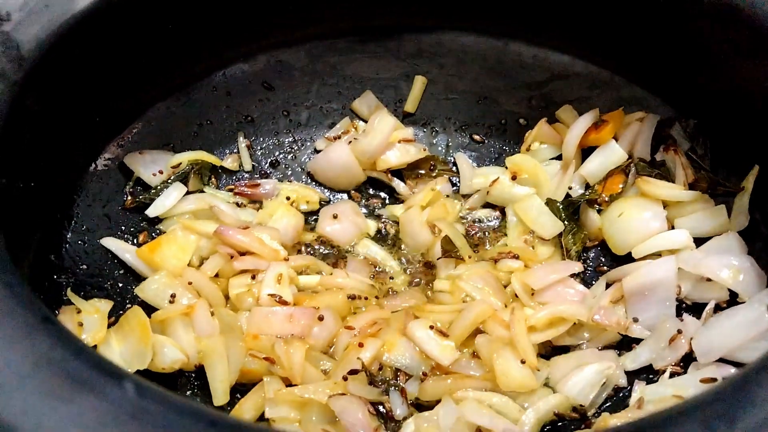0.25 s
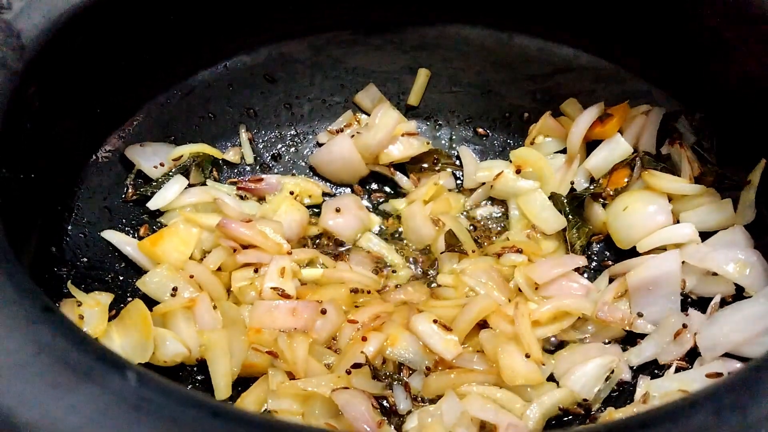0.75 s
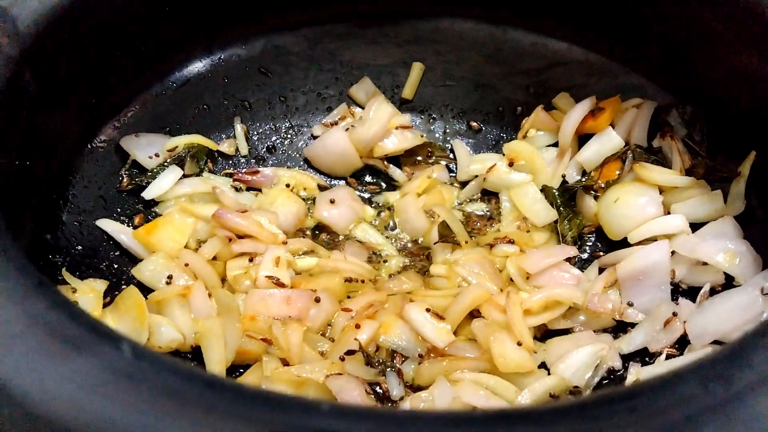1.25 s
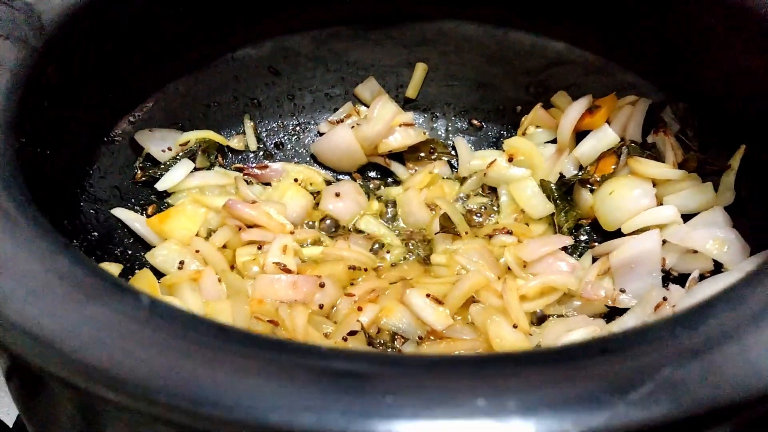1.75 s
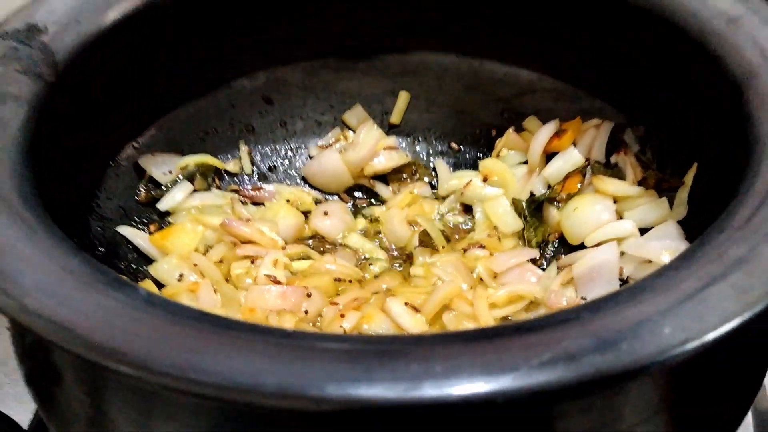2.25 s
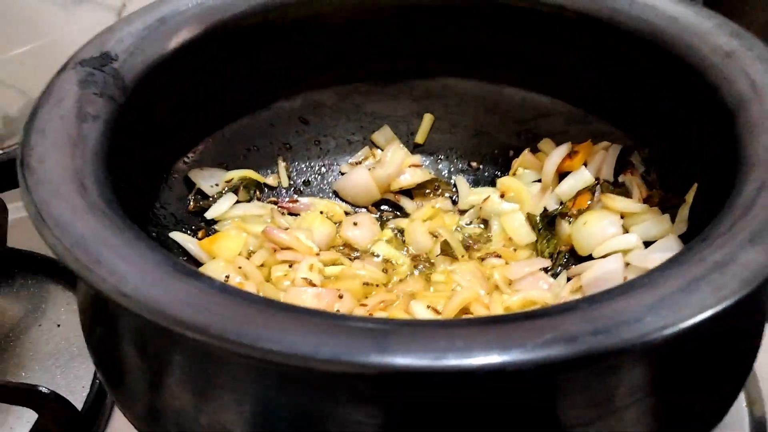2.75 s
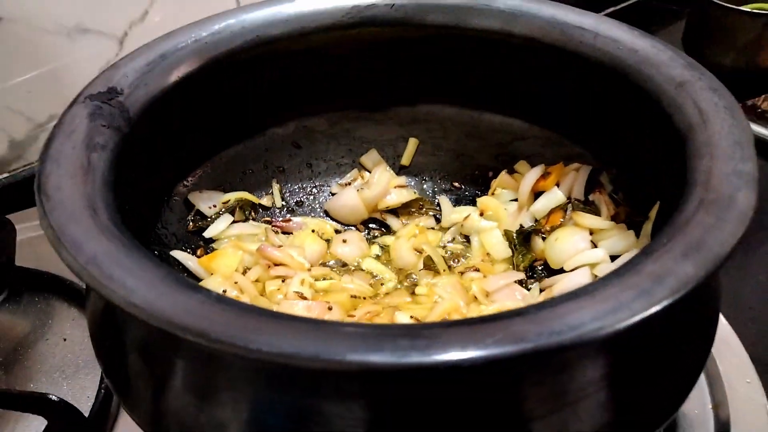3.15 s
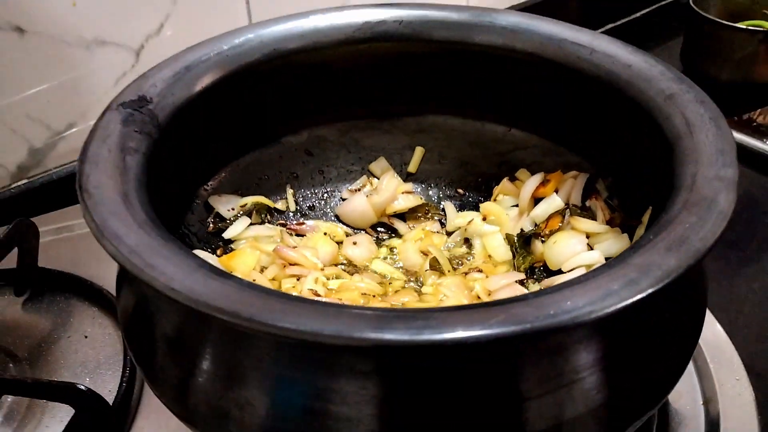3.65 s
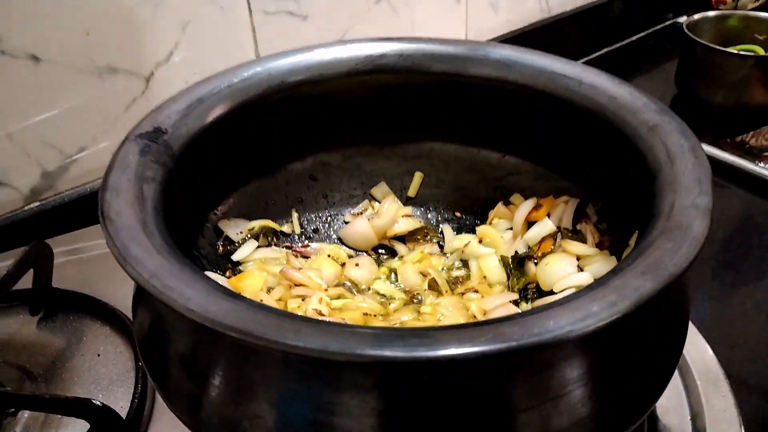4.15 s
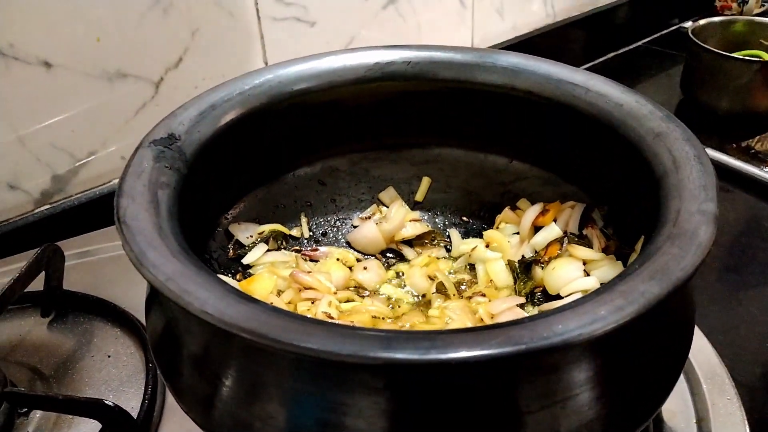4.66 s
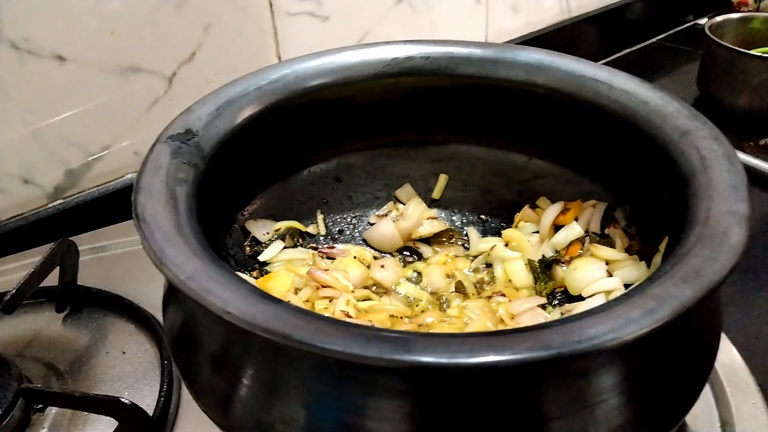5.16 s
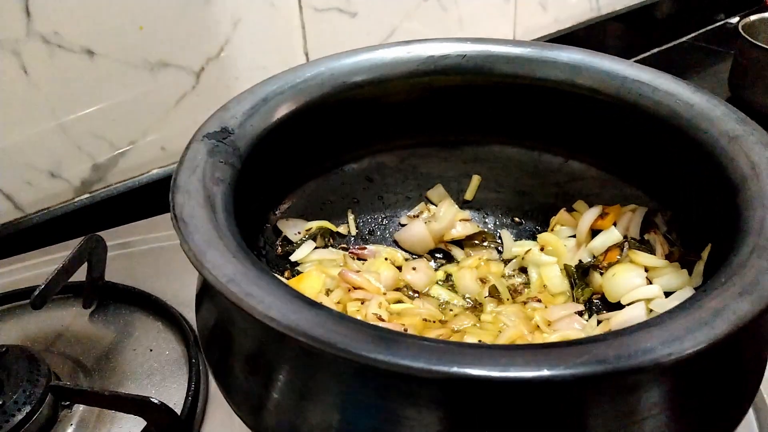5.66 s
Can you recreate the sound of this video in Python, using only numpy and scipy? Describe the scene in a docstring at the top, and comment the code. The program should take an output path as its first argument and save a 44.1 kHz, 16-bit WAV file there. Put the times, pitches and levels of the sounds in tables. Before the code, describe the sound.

A wooden spatula knocks and scrapes a clay pot of sizzling onions over a low throbbing hum, then a steel utensil rattles brightly.

```python
"""A wooden spatula knocks and scrapes on a clay pot: short noisy contacts ring the modes of pot, spatula or
other things and the tiled room answers; patchy band noise rubs, noise bands narrow or wide sing, and noise in
broad resonances makes tails and rough scrapes. Frying onions hiss and spit. A low engine-like hum, noisy
lines over a rumble, throbs underneath. At last a steel utensil rattles, taps and swelling modes, and the hum
drops away, its rumble returning at the very end. The recorder's noise suppressor turns down quiet moments."""
import sys
import numpy as np
from scipy import signal
from scipy.fft import rfft, irfft, next_fast_len
from scipy.io import wavfile
from scipy.ndimage import uniform_filter1d, map_coordinates

SR = 44100
rng = np.random.default_rng(int(sys.argv[2]) if len(sys.argv) > 2 else 0)


def master(y):
    """Save y as 16-bit WAV."""
    cut = np.clip(np.atleast_2d(y).T, -1, 1)
    pcm = np.round(cut * 32767)  # scale
    wavfile.write(sys.argv[1], SR, pcm.astype(np.int16))


N = 260278

# modes of the steel utensil: (frequency [Hz], relative level [dB])
STEEL = [(1857, -54), (2003, -52), (2121, -56), (2315, -39), (2815, -41), (2993, -36), (3160, -45),
         (4215, -37), (4414, -43), (4823, -55), (5222, -42), (5351, -48), (5588, -40), (5766, -46),
         (6045, -31), (6169, -44), (6665, -35), (6767, -49), (6934, -29), (7079, -33), (7370, -43),
         (7704, -37), (8430, -36), (8699, -32), (8882, -45), (9232, -50), (9340, -44), (9593, -45),
         (9717, -35), (9911, -53), (10212, -33), (10395, -42), (10794, -47), (10944, -41), (11197, -38),
         (11305, -49), (11768, -42), (12387, -36), (12462, -45), (12581, -33), (12941, -43), (13135, -48),
         (13216, -41), (13426, -48), (13609, -46), (13770, -49), (14131, -52), (14519, -46), (14594, -47),
         (14691, -46), (14879, -47), (15176, -48)]
# resonances of things other than the pot wall: (frequency [Hz], width [Hz], relative level [dB])
HOLLOW = [(474, 17, -2.5), (797, 92, 0), (1480, 45, -8.5), (1860, 33, -27.5), (2215, 97, -16),
          (2780, 38, -25), (2940, 16, -7), (3540, 170, -4), (3820, 25, -1.5)]
# same columns
DULL = [(495, 60, -2), (960, 140, -2), (1235, 80, 0), (1660, 60, -22), (2040, 37, -12), (2890, 60, -13),
        (3350, 90, -18.5)]
# same columns
WOODEN = [(880, 160, -9.5), (1020, 56, -0.5), (1094, 32, 2.5), (1225, 92, -7.5), (1560, 47, -18.5),
          (2345, 50, -6.5), (2850, 170, -18.5), (3400, 200, -16.5)]
# same columns
HIGH = [(1032, 67, -7), (1136, 41, -1), (1227, 34, 0), (2500, 200, -19)]
# same columns
CRISP = [(2550, 310, -0.35), (3480, 180, -1.4), (4900, 430, -1.5)]
# same columns
TINNY = [(508, 17, -10), (840, 60, -8), (1553, 15, -14.5), (2410, 64, -5), (3410, 300, -14),
         (4480, 42, -5.5), (4810, 39, -4.5), (5190, 28, -20), (5760, 35, -23)]
# same columns
HARD = [(2400, 450, -4.5), (2800, 450, 0), (3350, 500, -1.5), (4500, 700, -11)]


def amp(db):
    """dB to gain."""
    return 10 ** (np.asarray(db) / 20)


def unit(x):
    """Scaled to rms 1."""
    return x / np.sqrt(np.mean(x ** 2) + 1e-20)


def along(points, hz):
    """(Hz, value) points interpolated on a log frequency axis."""
    f, v = np.transpose(points)
    return np.interp(np.log(hz + 1), np.log(f + 1), v)


def curves(rows):
    """One value per sample for each dB column; -120 dB outside the rows."""
    s, *cols = np.transpose(rows)
    return [np.interp(np.arange(N) / SR, s, c, left=-120, right=-120) for c in cols]


def wobble(rate, size=N):
    """Smooth random curve, rate knots a second."""
    knots = rng.standard_normal(int(size * rate / SR) + 4)
    return map_coordinates(knots, [np.arange(size) * rate / SR])


def filtered(x, response):
    """x times a complex response of frequency."""
    m = next_fast_len(len(x) + SR // 2)
    return irfft(rfft(x, m) * response(np.fft.rfftfreq(m, 1 / SR)), m)[:len(x)]


def modes(table, f):
    """Response of causal (Hz, width Hz, dB) resonances, summed with alternating sign."""
    return sum((-1) ** k * amp(db) * 1j * f * w / (c * c - f * f + 1j * f * w)
               for k, (c, w, db) in enumerate(table))


def band(x, lo_hz, hi_hz):
    """Causal band-pass."""
    return signal.sosfilt(signal.butter(2, [lo_hz, hi_hz], "band", fs=SR, output="sos"), x)


def patchy(patchy_db, bins, frames):
    """Noise whose level differs in patches of pitch and time."""
    z = signal.stft(rng.standard_normal(N), nperseg=1024)[2]
    field = uniform_filter1d(rng.standard_normal(z.shape), size=bins, axis=0)
    field = unit(uniform_filter1d(field, size=frames, axis=1))
    gain = amp(patchy_db * np.minimum(field, 1.6))  # caps the loudest patches
    return signal.istft(z * gain, nperseg=1024)[1][:N]


def grains(share, spread_db):
    """Randomly placed clicks of widely scattered size; share is the fraction of samples that click."""
    draw = rng.random((2, N))
    size = amp(-spread_db * np.log(1 - .98 * draw[1]))
    return (draw[0] < share) * size * rng.standard_normal(N)


def fuzzy(hz, width_hz, steady=0, size=N):
    """Line of rms 1 whose strength and phase wander about a steady part; hz may glide."""
    turn = 2 * np.pi * np.cumsum(np.broadcast_to(hz, size)) / SR
    in_phase = (steady + wobble(width_hz, size)) * np.cos(turn)
    return unit(in_phase + wobble(width_hz, size) * np.sin(turn))


def hum():
    """Unsteady lines at or near multiples of a firing rate, over a low rumble."""
    # level course: (time [s], rumble [dB before a 3.5 dB cut], third order [dB], fifth order [dB])
    hum_course = [(0.0, -39, -41.5, -48.5), (0.3, -37, -45, -48), (0.6, -35.5, -40, -59),
                  (0.76, -38, -34, -60), (0.92, -39.5, -33, -68), (1.03, -33.5, -38, -39),
                  (1.08, -38, -45, -48), (1.43, -34, -44, -38.5), (1.49, -32, -35.5, -52.5),
                  (1.56, -37.5, -38.5, -47.5), (2.1, -37, -50.5, -33.5), (2.27, -37.5, -73, -41),
                  (2.35, -35.5, -46.5, -44.5), (2.81, -34, -55.5, -35), (3.52, -34.5, -37.5, -35),
                  (5.09, -36.5, -51, -53), (5.26, -37, -36.5, -45), (5.34, -42, -64, -84),
                  (5.83, -52.5, -49.5, -82), (5.9, -40.5, -46.5, -66)]
    # rumble spectrum: (frequency [Hz], relative level [dB])
    rumble_colour = [(12, -100), (20, -54.5), (32, -18), (97, 9), (173, 5.5), (252, -4.5), (331, -20),
                     (400, -78), (520, -84), (880, -120)]
    # weaker lines: (order [multiple of the firing rate], level over the rumble [dB])
    weak_orders = [(2, -13), (4, -3.5), (6, -12), (7, -16.5)]
    firing_hz = 34.54
    waver_db, waver_knots_per_s = 0.5, 5.8
    rumble_db, third_db, fifth_db = [db + waver_db * wobble(waver_knots_per_s) for db in curves(hum_course)]
    rumble = unit(filtered(rng.standard_normal(N), lambda f: amp(along(rumble_colour, f))))
    weak = sum(amp(db) * fuzzy(k * firing_hz, 12) for k, db in weak_orders)
    third = fuzzy(106, 12, steady=1.5)
    fifth = fuzzy(174, 12, steady=1.5)
    return amp(rumble_db - 3.5) * (rumble + weak) + amp(third_db) * third + amp(fifth_db) * fifth


def sizzle():
    """Frying oil: patchy hiss with tiny spits, over the quiet kitchen air."""
    # level course: (time [s], below about 9 kHz [dB], above [dB])
    sizzle_course = [(0.0, -49, -51), (0.69, -52.5, -52.5), (1.33, -49.5, -55.5), (1.57, -53.5, -52),
                     (1.8, -52, -53), (2.01, -48, -50.5), (2.27, -51.5, -54.5), (2.41, -49.5, -56),
                     (3.01, -53, -50), (3.21, -52.5, -50.5), (3.87, -52.5, -56), (4.14, -53.5, -56),
                     (4.36, -55, -56), (5.27, -58, -57)]
    # hiss spectrum: (frequency [Hz], relative level [dB])
    fizz_colour = [(2060, -55.5), (3500, 2), (4040, -33), (4350, -53.5), (5150, 0.5), (5900, 5.5),
                   (7000, 1), (8400, 2), (10000, 2.5), (11600, 1), (13000, -1.5), (14800, -3), (15500, -31)]
    # air spectrum: (frequency [Hz], relative level [dB])
    air_colour = [(12, -54), (20, -6.5), (83, 6), (519, -3.5), (667, -4.5), (2760, -10), (3080, -11),
                  (3960, -52.5), (4310, -31), (4810, -5.5), (6910, -8.5), (11400, -10.5), (15500, -12)]
    spit_share, spit_db = 0.006, -4  # fraction of samples; level over the hiss
    spits = unit(grains(spit_share, spread_db=5))
    oil = unit(patchy(1.1, 12, 10)) + amp(spit_db) * spits
    air = unit(filtered(patchy(4.2, 12, 10), lambda f: amp(along(air_colour, f))))
    hiss = filtered(oil, lambda f: amp(along(fizz_colour, f)))
    low = filtered(hiss, lambda f: 1 / (1 + (f / 9000) ** 8))
    low_db, high_db = curves(sizzle_course)
    return amp(low_db) * unit(low) + amp(high_db) * unit(hiss - low) + amp(-51) * air


def strokes():
    """Rubbing wakes now one, now another resonance of pot and spatula: patchy noise in four bands."""
    # level course: (time [s], lowest band [dB], second [dB], third [dB], highest [dB])
    stroke_course = [(0.0, -62, -56, -44.5, -60), (0.17, -64, -50.5, -55, -58),
                     (0.32, -68, -54.5, -55.5, -56), (0.5, -64, -58.5, -52.5, -60.5),
                     (0.65, -67, -56, -51.5, -63), (0.75, -43, -48, -53.5, -63.5),
                     (0.86, -40.5, -45, -46.5, -54), (1.04, -49.5, -50.5, -48.5, -56),
                     (1.16, -49.5, -31, -47.5, -45), (1.25, -41.5, -40, -36, -43),
                     (1.38, -42, -38.5, -51, -47.5), (1.54, -56.5, -45, -41.5, -44.5),
                     (1.79, -52.5, -53, -47, -48.5), (1.92, -46.5, -51.5, -46.5, -47),
                     (2.08, -67, -46.5, -48, -45), (2.25, -60.5, -46, -36.5, -44),
                     (2.35, -57.5, -50, -44, -48.5), (2.48, -61, -44, -45.5, -53.5),
                     (2.64, -57.5, -64, -43, -52), (2.74, -58.5, -45, -44, -41),
                     (2.92, -53, -50.5, -45, -52), (3.16, -52, -58, -45.5, -51),
                     (3.29, -58.5, -55, -46.5, -55), (3.61, -66.5, -67.5, -49, -54),
                     (3.74, -67, -52, -46, -48.5), (3.9, -52, -62.5, -46.5, -60.5),
                     (4.14, -54, -44, -45, -62), (4.3, -52, -47, -47, -65), (4.4, -54, -58, -49, -65),
                     (4.61, -66, -62, -48.5, -57.5), (4.76, -70, -56.5, -48, -55.5),
                     (4.92, -71, -60, -54, -67.5), (5.03, -58, -51.5, -47.5, -50),
                     (5.14, -58, -57.5, -47.5, -55), (5.27, -73, -64, -56.5, -63)]
    edges_hz = [(240, 450), (450, 850), (850, 1750), (2100, 5000)]
    depth_db = [6, 9.0, 5.9, 7.4]
    # each band-pass runs twice for steeper edges
    rubs = [unit(band(band(patchy(d, 3, 12), *e), *e)) for d, e in zip(depth_db, edges_hz)]
    return sum(amp(db) * rub for db, rub in zip(curves(stroke_course), rubs))


def singing():
    """Noise bands, narrow or wide, start quickly and fade, some gliding: rubbing tones, rings, late steel."""
    # rubbing tones, rings after blows and late steel ringing:
    # (start [s], length [s], from [Hz], to [Hz], width [Hz], level before fade [dB])
    singing_bands = [(0, 0.066, 764, 776, 72, -46.5), (0.119, 0.11, 3820, 3730, 103, -35.5),
                     (0.27, 0.6, 773, 771, 67, -50), (0, 0.97, 1510, 1543, 145, -54),
                     (1.016, 0.21, 235.6, 235.6, 13.7, -30), (1.008, 0.06, 400, 409, 50, -26),
                     (1.049, 0.043, 462, 460, 21, -21), (1.353, 0.22, 2285, 2380, 132, -43.5),
                     (1.42, 0.3, 3400, 3400, 50, -44), (1.73, 0.12, 3390, 3400, 70, -46),
                     (1.83, 0.17, 3460, 3440, 120, -45), (2.02, 0.05, 3150, 3150, 300, -46),
                     (2.05, 0.15, 3390, 3400, 80, -51), (1.72, 0.05, 2700, 2600, 150, -41),
                     (1.38, 0.2, 2900, 2950, 90, -48), (1.44, 0.15, 5820, 5700, 1400, -47),
                     (1.74, 0.1, 2250, 2280, 120, -47), (1.81, 0.2, 2330, 2330, 200, -44),
                     (2.0, 0.19, 2450, 2480, 200, -48), (1.819, 0.15, 5960, 5840, 2900, -44),
                     (2.012, 0.13, 1023, 1017, 228, -39), (2.57, 0.25, 5900, 5700, 600, -49),
                     (3.058, 0.34, 2620, 2610, 186, -50.5), (3.125, 0.11, 3150, 4300, 500, -42),
                     (3.2, 0.14, 4100, 5560, 600, -43), (3.18, 0.12, 802, 1190, 214, -41.5),
                     (3.294, 0.19, 1173, 1143, 100, -48.5), (3.464, 0.34, 2820, 2575, 180, -51),
                     (3.549, 0.69, 996, 1028, 275, -43), (4.059, 0.21, 517, 517.4, 3.9, -38.5),
                     (4.06, 0.21, 1560, 1552, 33, -42), (4.213, 1, 1596, 1580, 290, -53),
                     (4.42, 0.1, 1000, 990, 80, -52), (4.455, 0.09, 780, 780, 70, -50),
                     (4.48, 0.05, 1380, 1380, 60, -52), (4.3, 0.3, 2100, 2050, 250, -58),
                     (4.56, 0.13, 900, 900, 130, -49), (4.69, 0.12, 980, 1030, 100, -50),
                     (4.82, 0.05, 720, 720, 80, -49), (4.598, 0.2, 3860, 4000, 130, -56.5),
                     (4.92, 0.3, 1485, 1495, 25, -44), (4.88, 0.26, 850, 850, 60, -43),
                     (4.872, 0.085, 650, 650, 30, -44.5), (5.4, 0.1, 1478, 1478, 25, -56),
                     (5.46, 0.33, 1478, 1478, 25, -48), (5.292, 0.35, 2315, 2315, 20, -39),
                     (0.696, 0.06, 362, 360, 25, -28), (0.67, 0.15, 240, 246, 40, -37.5),
                     (0.896, 0.09, 1000, 990, 80, -43), (1.056, 0.053, 420, 412, 60, -24),
                     (4.599, 0.22, 2300, 2320, 600, -51.5)]
    out, t = np.zeros(N + SR), np.arange(SR) / SR
    for start, length, from_hz, to_hz, width_hz, db in singing_bands:
        u = np.clip(t / length, 0, 1)
        shape = np.minimum(u / 0.012, 1) * np.minimum((1 - u) / 0.67, 1)
        path_hz = from_hz + (to_hz - from_hz) * u
        line = fuzzy(path_hz, width_hz, steady=30 / width_hz, size=SR)  # the narrowest hold almost steady
        out[round(start * SR):][:SR] += amp(db) * shape * line / np.std(line[shape > 0])
    return out[:N]


def tail(n):
    """Fresh room answer of energy 1: near surfaces, and the room with each frequency dying at its own speed."""
    # room decay: (frequency [Hz], t60 [s])
    room_decay = [(200, 0.65), (800, 0.63), (2500, 0.73), (6000, 0.38), (15000, 0.67)]
    early_db, early_t60_s = -2, 0.17  # near surfaces: energy over the room's, decay
    hz, t, z = signal.stft(rng.standard_normal(n), SR, nperseg=256)
    decay = amp(-60 * t / along(room_decay, hz)[:, None])
    room = signal.istft(z * decay, SR, nperseg=256)[1][:n]
    early = rng.standard_normal(n) * amp(-60 * np.arange(n) / SR / early_t60_s)
    answer = unit(room) + amp(early_db) * unit(early)
    return answer / np.linalg.norm(answer)


def blows():
    """A short noisy contact and its room answer ring the pot and spatula, or another thing that is struck."""
    # (time [s], crack peak [dB], then thud, knock, edge and tick peaks over the crack [dB],
    #  pitch of the spatula's knock [Hz], ringing [dB], room [dB])
    blow_list = [(0.1185, -26, 5, 11.5, 1, 6.5, 770, 16.5, 5.5),
                 (0.375, -55, -20, -10, 5, 16, 751, -20, -5), (0.394, -55, -20, -5, 7, 18, 751, -20, -5),
                 (0.519, -44, -23, -4.5, 2, 14, 751, -10, 3),
                 (0.6142, -30, -26.5, 0, -30, -34, 1090, -10, 7),
                 (0.6395, -31, -9.5, -6, 7, 3, 694, -10, -2), (0.651, -35, -9.5, -6, 3, -3.5, 694, -10, -2),
                 (0.6735, -14.5, -1, -2, -11.5, -5.5, 815, 12, -2),
                 (0.688, -27, 2, 6, -8, -10, 1000, 14, 0), (0.705, -29, 5, 2, -1, -3, 1000, 8, 0),
                 (0.9889, -27.5, 12, 8.5, -5, -4.5, 838, -5.5, 4),
                 (1.011, -14, 0.5, 4, -27, -8.5, 444, 2.5, 10.5),
                 (1.0237, -20, 4, 5.5, 2.5, -1, 401, -18, 12.5),
                 (1.0337, -36.5, -4, 6.5, -1, -5, 500, -20.5, 1),
                 (1.229, -26, 2.5, -11, -0.5, 5, 398, -12.5, -2),
                 (1.3521, -28, -14.5, -1.5, -7.5, -2.5, 1090, -9, 5),
                 (1.726, -35.5, -23, 3, -12, -28.5, 724, 5.5, 5.5),
                 (2.0348, -29.5, -9.5, -5.5, -46, -14, 1310, 15.5, 6),
                 (2.1941, -17.5, -30, 8, 3, 2, 1080, 24, -1),
                 (2.212, -28, -27, 14.5, 6, -5, 1080, 30.5, -8),
                 (2.231, -28.5, -26, 10, -3, -7, 1080, 26, -11),
                 (2.2925, -43.5, -2, -10, 18, 21, 1080, -10, 3),
                 (2.385, -33, -30, -10, -2.5, -2.5, 1090, 13, 5),
                 (2.4262, -33.5, -9.5, -1.5, -3.5, 9, 940, -7, -11),
                 (2.5865, -40, -10, 17, 0, 2.5, 1020, 14, -2),
                 (2.6958, -35.5, -23, 15, -0.5, 6.5, 1150, 25, -3),
                 (2.708, -36.5, -17, 20, 2, -0.5, 1150, 26, -8),
                 (2.7212, -33, -20, -3, 12, 3, 1120, -2, -1),
                 (2.7694, -23.5, -24, -9, 3.5, 4, 1150, 10, -1),
                 (2.8163, -29.5, -14, -3.5, 5.5, -14, 1210, -19, 0),
                 (2.941, -37, -1.5, -6.5, -19, -9, 869, -5.5, 6.5),
                 (3.003, -29, -5, -13.5, -16.5, 8.5, 511, -3.5, -1),
                 (3.0493, -13.5, -32, -32, -6, 0.5, 2600, 24, -3),
                 (3.1635, -36, -34.5, 4, -1, -9, 1470, -7.5, 11),
                 (3.217, -30, -17.5, -6.5, 1.5, -2, 1040, -3, 2),
                 (3.338, -36.5, -2, 5, -25, -2, 1160, 8, 0.5),
                 (3.3982, -41.5, 2, -4, -6.5, 12, 1110, -16.5, 3.5),
                 (3.4892, -35, -10, -5.5, 4, 8, 620, -3.5, 1),
                 (3.5703, -52, -23, 23.5, 5, 0, 960, -52.5, 4.5),
                 (3.6226, -34, -19.5, 5.5, -2.5, 3, 1370, 12, 5.5),
                 (3.7216, -47, 4, 18.5, -34, -18, 1150, 2, 9.5),
                 (4.07, -20.5, 0.5, 3, 6.5, 11, 483, 19.5, -3.5),
                 (4.565, -46, -19, 8, -18, -2, 912, -13, 5),
                 (4.8713, -17.5, -32.5, -31, -8.5, -1.5, 2520, -18, -19),
                 (4.8715, -5.5, -49, -13.5, -41, -2.5, 2520, 16, -4),
                 (5.2827, -24, -33, -26, -9, 0, 1235, -14, -6.5)]
    # clay wall modes: (frequency [Hz], width [Hz], relative level [dB])
    pot_modes = [(237, 26, -6), (409, 79, 0), (942, 21, -9), (1060, 28, -7), (1220, 32, -5),
                 (1880, 82, -13), (2130, 94, -10), (2950, 33, -13), (3220, 33, -13), (4080, 29, -19),
                 (5390, 53, -21)]
    # upper spatula modes: (frequency [Hz], width [Hz], level over its knock [dB])
    tool_modes = [(2400, 250, -10), (3350, 300, -10)]
    # bands thud, knock, crack, edge, tick: (from [Hz], to [Hz])
    bands_hz = [(200, 650), (650, 1700), (1700, 3600), (3600, 6500), (6500, 16000)]
    # blows that land on another thing: (time [s], its resonances)
    struck = [(0.118, HOLLOW), (0.674, DULL), (0.688, DULL), (0.709, DULL), (2.195, WOODEN),
              (2.211, WOODEN), (2.231, WOODEN), (2.696, HIGH), (2.708, HIGH), (3.05, CRISP), (4.07, TINNY),
              (4.872, HARD)]
    contact_t60_s, dull_hz = 0.023, 9000  # wood dulls the contact above dull_hz
    wall_db, tool_db, tool_width_hz = 6.5, 16.5, 52
    uneven_db, uneven_hz = 3, 350  # peaks and dips in each room answer: depth, spacing
    n = int(.7 * SR)
    out, t = np.zeros(N + n), np.arange(n) / SR
    for s, db, thud, knock, edge, tick, knock_hz, ring_db, room_db in blow_list:
        push = rng.standard_normal(n) * amp(-60 * t / contact_t60_s)
        push[:2] = 2, -1  # the first touch is one sharp step
        answer = np.pad(tail(n), (150, 0))[:n] * np.linalg.norm(push)  # walls answer 150 samples later
        knots = rng.standard_normal(64)
        answer = filtered(answer, lambda f: amp(uneven_db * np.interp(f / uneven_hz, np.arange(64), knots)))
        tool = [(knock_hz, tool_width_hz, 0), *tool_modes]
        # where it is struck sets how strongly each wall mode speaks
        wall = [(c, w, g + rng.normal(0, 0.53)) for c, w, g in pot_modes]
        other = [thing for at, thing in struck if abs(at - s) < .005]

        def body(f):
            """Dulled contact plus ringing; another thing rings alone."""
            if other:
                ringing = modes(other[0], f)
            else:
                ringing = amp(tool_db) * modes(tool, f) + amp(wall_db) * modes(wall, f)
            return 1 / (1 + 1j * f / dull_hz) ** 2 + amp(ring_db) * ringing

        heard = filtered(push + amp(room_db) * answer, body)
        # neighbouring bands alternate in sign so that they join without a gap
        for k, ((lo, hi), rel_db) in enumerate(zip(bands_hz, (thud, knock, 0, edge, tick))):
            part = band(heard, lo, hi)
            out[round(s * SR):][:n] += (-1) ** k * amp(db + rel_db) * part / np.abs(part).max()
    return out[:N]


def tails_and_scrapes():
    """Noise in a broad resonance, dense or grainy, dying away: tails after blows, rough scrapes between."""
    # (start [s], rise [s], t60 [s], centre [Hz], resonance width [Hz], level before rise and decay [dB],
    #  density [share of samples 0-1])
    scrape_list = [(4.875, .004, 1.0, 2700, 1900, -29, .5), (4.875, .004, .6, 10500, 6000, -38, .5),
                   (4.075, .004, .8, 950, 700, -36, .3), (0.99, .003, .3, 1500, 2500, -30, .1),
                   (2.8, .02, .3, 8000, 8000, -44, .02), (0.677, .004, .4, 1000, 700, -29, .3),
                   (0.677, .004, .4, 3100, 1800, -36, .3), (0.615, .01, .3, 3000, 3000, -42, .1),
                   (0.638, .003, .15, 5000, 6000, -36, .1), (1.012, .02, .45, 5000, 7000, -31, .1),
                   (1.015, .02, .4, 1100, 600, -31, .2), (2.29, .005, .2, 7000, 8000, -44, .02),
                   (2.38, .02, .25, 6000, 8000, -44, .02), (2.59, .05, .6, 7000, 8000, -46, .015),
                   (2.72, .02, .5, 6000, 8000, -43, .015), (4.072, .003, .35, 6000, 9000, -36, .3),
                   (0.12, .01, .5, 2900, 2000, -41, .3)]
    out, t = np.zeros(N + SR), np.arange(SR) / SR
    for start, rise, t60, hz, width_hz, db, share in scrape_list:
        noise = (rng.random(SR) < share) * rng.standard_normal(SR)
        # the resonance acts twice
        scrape = unit(filtered(noise, lambda f: modes([(hz, width_hz, 0)], f) ** 2))
        out[round(start * SR):][:SR] += amp(db - 60 * t / t60) * np.minimum(t / rise, 1) * scrape
    return out[:N]


def rattle():
    """Steel chatters against steel: dense taps, and thin modes that swell each in its own way."""
    # level course: (time [s], treble [dB], low modes [dB], ringing over chatter [dB])
    rattle_course = [(5.284, -15.5, -41, 3), (5.305, -19, -50, 1), (5.33, -25, -49, 1),
                     (5.344, -20.5, -40, 4), (5.365, -19.5, -45, 4), (5.385, -15.5, -41, 5),
                     (5.425, -15.5, -40, 5), (5.44, -16, -47, 6), (5.48, -18.5, -38, 3),
                     (5.52, -19, -38.5, 2), (5.545, -20.5, -37, 2), (5.584, -24, -36, 3),
                     (5.638, -32, -45.5, -1.5), (5.7, -43.5, -57, -1), (5.76, -47, -56, -0.5),
                     (5.812, -54, -74.5, -3.5), (5.88, -61, -79, -6)]
    # chatter spectrum between the modes: (frequency [Hz], relative level [dB])
    chatter_colour = [(710, -81), (1200, -52.5), (1640, -68), (1800, -13), (2260, -13.5), (2540, -21),
                      (3080, -7), (3690, -11), (4290, -10), (4880, -12), (6370, -14), (6870, -12),
                      (9170, -12), (12800, -10), (15500, -10)]
    # modes that are smeared: (frequency [Hz])
    broad_hz = [4414, 5222, 6665, 7370, 7704, 8430, 8882, 9717, 10395, 11197, 11768, 12387, 13426, 13609]
    swell_db, shoulder_db = 4, 51  # depth of swelling; how much chatter gathers round the modes
    taps = unit(grains(.25, spread_db=2.5))
    shoulders = [(hz, 150, db + shoulder_db) for hz, db in STEEL]
    chatter = unit(filtered(
        taps, lambda f: amp(along(chatter_colour, f)) * (1 + np.abs(modes(shoulders, f)))))
    ring = np.zeros(SR)
    for hz, db in STEEL:
        smeared = min(abs(hz - b) for b in broad_hz) < 15
        width_hz = 130 if smeared else 25 + hz / 400
        swell = amp(db + swell_db * wobble(16, SR))
        ring += swell * fuzzy(hz, width_hz, steady=35 / width_hz, size=SR)
    ring = np.pad(unit(ring), (N - SR, 0))  # the last second only
    high_db, low_db, ring_db = curves(rattle_course)
    share = 1 / (1 + amp(-2 * np.clip(ring_db, -30, 30)))  # ringing's share of the power
    both = np.sqrt(share) * ring + np.sqrt(1 - share) * chatter
    # the lowest modes follow their own level
    low = filtered(both, lambda f: f < 2500)
    return amp(high_db) * (both - low) + amp(low_db) * low / np.std(low[-SR:]) + clangs()


def clangs():
    """Each harder contact strikes all steel modes at once, unevenly, with a brief noise burst."""
    # (time [s], initial level before band-pass [dB])
    clang_list = [(5.284, -23), (5.337, -38), (5.382, -22), (5.418, -30), (5.435, -30), (5.52, -34),
                  (5.534, -37.5)]
    ring_t60_s, burst_t60_s, spread_db = 0.12, .006, 9
    t = np.arange(SR // 4) / SR
    out = np.zeros(N + len(t))
    hz, level_db = np.transpose(STEEL)
    for s, db in clang_list:
        gain = amp(level_db + spread_db * rng.standard_normal(len(hz)))
        ring = gain @ np.sin(2 * np.pi * hz[:, None] * t) / np.linalg.norm(gain)
        burst = amp(db + 4 - 60 * t / burst_t60_s) * rng.standard_normal(len(t))
        out[round(s * SR):][:len(t)] += amp(db - 60 * t / ring_t60_s) * ring + burst
    return band(out[:N], 2500, 16000)


def suppress(x):
    """Noise suppressor: bands that sink towards their median power are turned down, by 10 dB at most."""
    # (frequency [Hz], gain lost when power equals its median [share 0-1])
    suppress_share = [(250, 0.13), (400, 0.34), (2000, 0.3), (4500, 0.025), (6000, 0.16), (15000, 0.024)]
    hz, _, z = signal.stft(x, SR, nperseg=1024, noverlap=768)
    power = uniform_filter1d(uniform_filter1d(np.abs(z) ** 2, size=5, axis=0), size=7, axis=1)
    usual = np.median(power, axis=1, keepdims=True)
    gain = 1 - along(suppress_share, hz)[:, None] * usual / (power + 1e-20)
    gain = np.clip(gain, amp(-10), 1)
    return signal.istft(z * gain, SR, nperseg=1024, noverlap=768)[1][:N]


def scene():
    """Everything, at one microphone."""
    return (hum() + sizzle() + strokes() + singing() + blows() + tails_and_scrapes() + rattle())[None]


def record(dry):
    """Noise suppressor, then a band limit."""
    top_hz = 15550
    return filtered(suppress(dry[0]), lambda hz: hz < top_hz)[None]


dry = scene()
out = record(dry)
master(out)
```